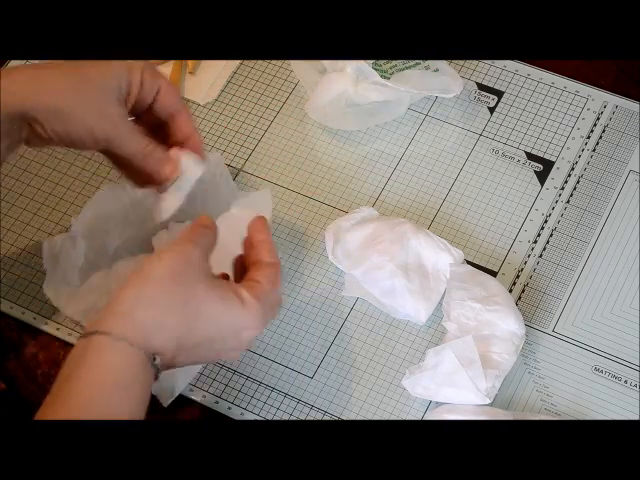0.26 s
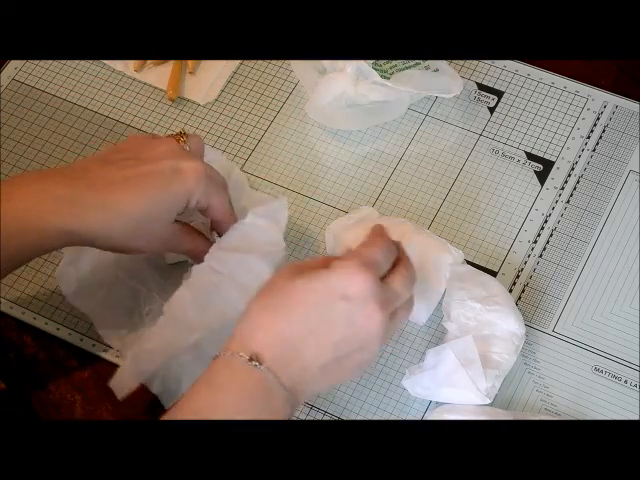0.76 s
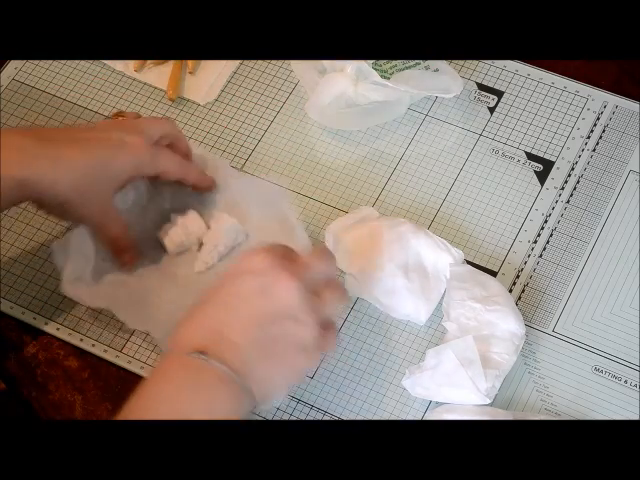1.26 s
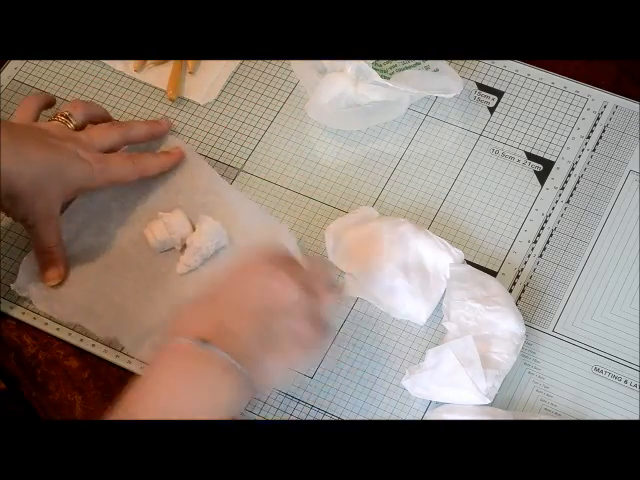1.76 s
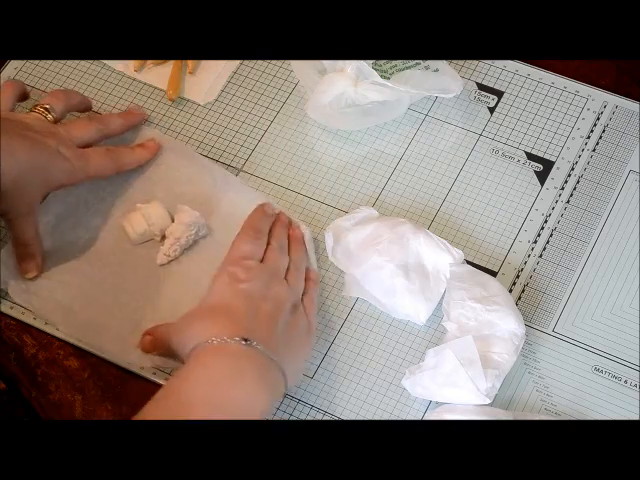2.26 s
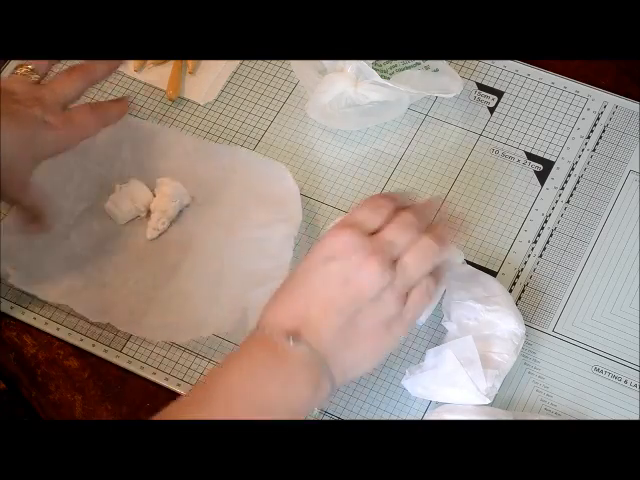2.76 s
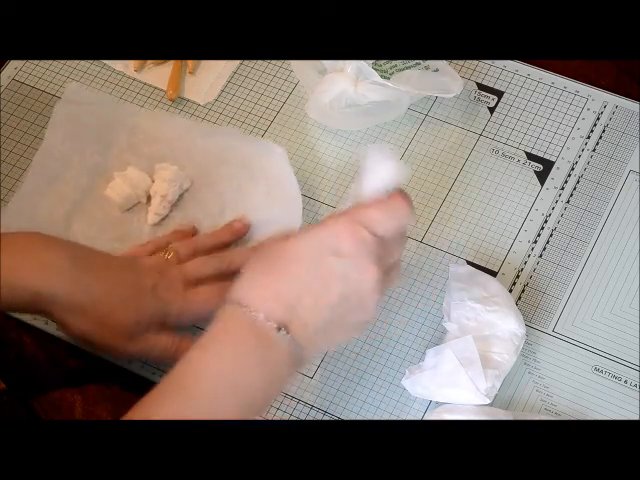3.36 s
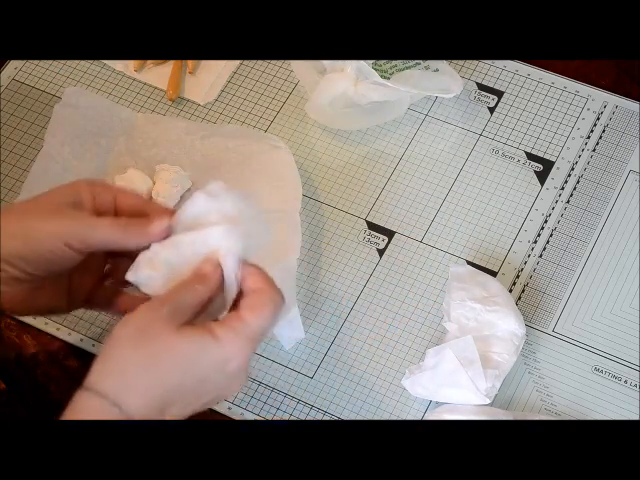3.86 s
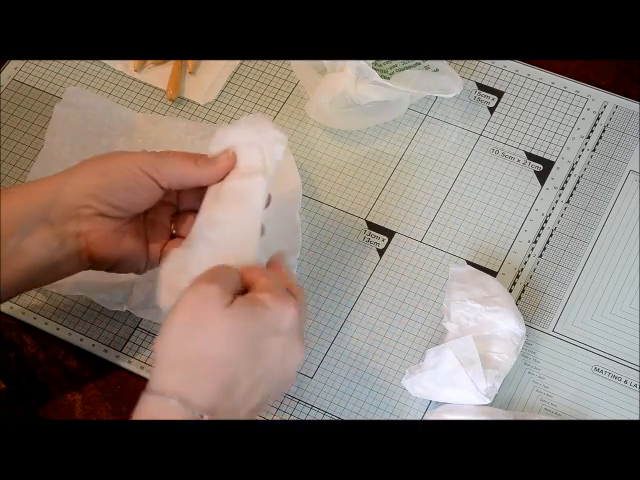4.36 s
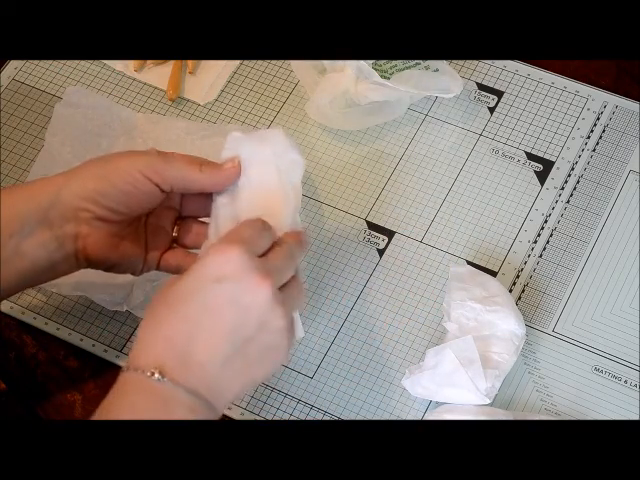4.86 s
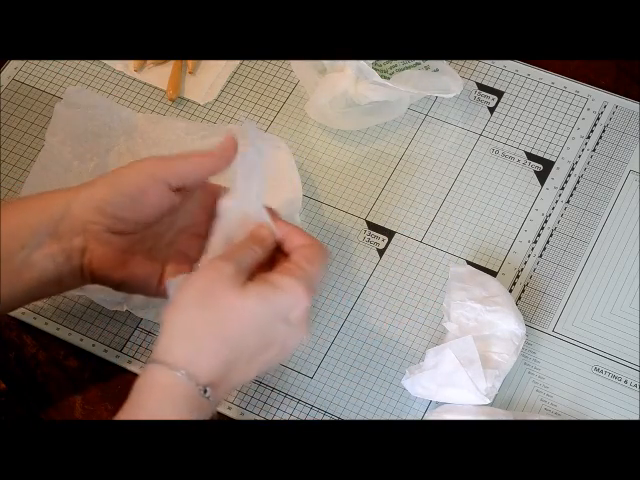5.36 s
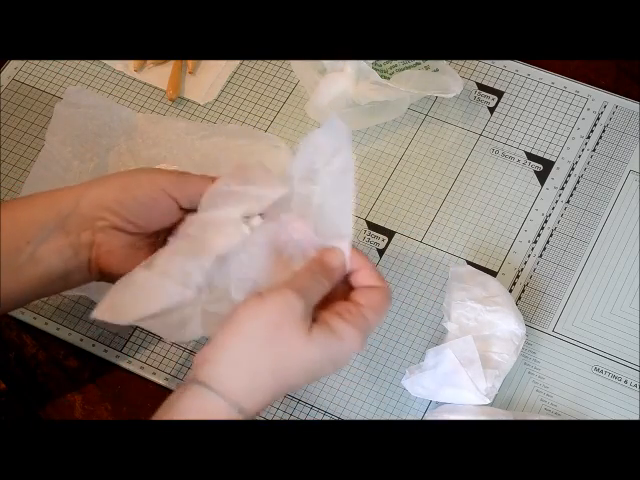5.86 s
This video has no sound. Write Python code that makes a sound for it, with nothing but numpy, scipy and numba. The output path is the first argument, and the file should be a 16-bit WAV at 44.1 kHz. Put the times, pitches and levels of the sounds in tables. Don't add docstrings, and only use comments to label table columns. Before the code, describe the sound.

Dry, bright crackling of delicate tissue paper being handled, swelling and easing in uneven strokes, with tiny sharp snaps and soft dull pops.

```python
import sys
import numpy as np
from scipy import signal
from scipy.fft import rfft, irfft, next_fast_len
from scipy.io import wavfile
from scipy.ndimage import uniform_filter1d
from numba import njit

SR = 44100
rng = np.random.default_rng(int(sys.argv[2]) if len(sys.argv) > 2 else 0)


def pcm_store(signal):
    levels = np.round(np.clip(np.atleast_2d(signal), -1, 1) * 32767)
    wavfile.write(sys.argv[1], SR, levels.astype(np.int16).T)


def voltage_ratio(level):
    return 10 ** (np.asarray(level, float) / 20)


N = 268991

# (frequency [Hz], density [dB per Hz])
FLOOR_SPECTRUM = [(15, -46), (25, -11), (381, 3.5), (518, 1.5), (1300, -1), (6280, -18.5), (7130, -20),
                  (7900, -9), (9200, -30), (11000, -20), (14300, -49), (22000, -120)]
# (frequency [Hz], gain [dB])
ROLL_OFF = [(10000, -2), (10600, -5.5), (11200, -12), (11700, -27.5), (12000, -55)]
# (frequency [Hz], density [dB per Hz])
PAPER_SPECTRUM = [(100, -39), (300, -19), (500, -11), (900, -3), (1200, -3), (2000, -4.5), (4500, -2.5),
                  (7000, 0.5), (9400, 8.5), (11000, 2), (14000, -4.5)]
FOLD_EDGES_HZ = [1500., 3500., 6500.]

# (time [s], top rms level [dB], patch frequency [Hz], low body re top [dB], length [ms])
SNAPS = [(0.2136, -52, 6760, -11.5, 1.2), (0.4576, -57, 2330, 11, 1.5), (0.4931, -36.5, 4900, -13, 0.45),
         (0.54, -44, 4130, 3.5, 2.1), (0.7547, -43, 9100, -2.5, 2.6), (0.9756, -35.5, 5870, -4.5, 3.6),
         (1.446, -32, 8870, -16, 1.7), (1.4814, -29.5, 8830, -16, 1.2), (1.509, -29, 9260, -13, 1.4),
         (1.908, -50, 6080, -6, 1.1), (2.0372, -45, 5930, -21, 1.1), (2.068, -43, 7400, -17, 1.4),
         (2.58, -34.5, 8630, -15, 1.24), (2.6409, -31.5, 9200, -14.5, 1.5), (3.419, -37.5, 9500, -19, 1.1),
         (3.6964, -43, 2420, -19, 1.1), (4.585, -37.5, 7110, -8, 0.54), (4.782, -41, 6590, -1.5, 4.2),
         (4.887, -37.5, 9220, -2, 2.1), (5.1641, -39, 9350, -5, 1.9), (5.2422, -32, 6960, -10, 1.5),
         (5.486, -32.5, 9200, -12, 3.3), (5.643, -34.5, 5080, -10, 1.1), (5.924, -35, 9990, -19, 1.5)]
# (time [s], top rms level [dB], patch frequency [Hz], low body re top [dB])
SHEET_TICKS = [(0.058, -48, 8600, -7), (0.0713, -41.5, 8600, -19.5), (0.0775, -48, 8700, -6),
               (0.0895, -48, 5540, -5), (0.0981, -41.5, 8240, -24), (0.1803, -54, 7110, -3),
               (0.274, -40, 7940, -6.5), (0.319, -40, 8700, -3), (0.3662, -43.5, 9430, -4),
               (0.44, -52, 6290, -12.5), (0.5355, -37, 9520, -14), (0.5662, -31, 5300, -11.5),
               (0.7296, -47, 6030, -11), (0.906, -42, 5600, -13), (1.0485, -39, 7540, -8),
               (1.258, -35, 6930, -5), (1.333, -30, 9430, -7), (1.3601, -32, 4260, -20),
               (1.5183, -27.5, 6500, -15), (1.6179, -32, 9820, -33), (1.789, -44, 9650, -19),
               (2, -46, 9500, -15.5), (2.198, -29, 9430, -21), (2.204, -28.5, 9560, -20),
               (2.502, -35, 8180, -20), (2.6847, -41.5, 3800, -12), (2.722, -42.5, 8500, -18),
               (2.745, -44, 9900, -21), (2.814, -52, 8960, -10), (2.8304, -43, 9100, -14)]
# (time [s], top rms level [dB], patch frequency [Hz], low body re top [dB])
BUNDLE_TICKS = [(3.0168, -35, 3010, -21), (3.027, -39, 8310, -18), (3.314, -39.5, 8400, -22),
                (3.332, -41.5, 4610, -10.5), (3.491, -44, 8790, -11), (3.5939, -36.5, 4000, -18),
                (3.62, -44, 9350, -37), (3.6732, -44, 5100, -17), (3.7183, -36, 2660, -17),
                (3.7374, -42, 5170, -21), (3.7588, -43, 3005, -17), (3.7775, -39, 8350, -24),
                (3.8017, -42.5, 6420, -3), (3.8601, -33, 9400, -28), (3.9008, -37, 6940, -7),
                (4.0146, -37, 4570, -17), (4.1259, -35, 6000, -9.5), (4.151, -33.5, 5130, -18),
                (4.4697, -38, 8790, -15), (4.623, -40.5, 9300, -16), (4.6876, -38.5, 6260, -24),
                (4.75, -31, 9200, -12), (4.7959, -32.5, 9560, -7), (5.106, -44, 4090, -16),
                (5.1385, -29, 7400, -14), (5.3042, -39, 7100, -3), (5.7, -34, 2800, -27),
                (5.7605, -33.5, 8450, -21), (5.8788, -28, 9300, -11), (6.0288, -33.5, 8700, -20)]
# (time [s], top rms level [dB], patch frequency [Hz])
FAINT_TICKS = [(.0116, -50, 9100), (0.037, -62, 8480), (0.4785, -49, 4910), (.485, -45.5, 5700),
               (.51, -46, 4090), (0.5173, -46, 8570), (0.5307, -46, 9560), (0.7192, -45, 3830),
               (0.8847, -50, 3400), (1.1123, -49, 9470), (1.8237, -47, 6800), (2.0192, -48, 3790),
               (2.314, -35, 9470), (2.486, -38, 4480), (2.6333, -38, 8700), (2.7319, -43, 9900),
               (3.3244, -40, 3140), (3.408, -37.5, 8660), (3.6005, -58, 8700), (3.649, -47, 4800),
               (4.0303, -41.5, 7110), (4.083, -41.5, 4820), (4.245, -36.5, 8350), (4.4155, -45, 6290),
               (4.4955, -40.5, 3180), (4.539, -41.5, 4350), (4.9426, -36, 5430), (5.0697, -40.5, 8740),
               (5.3498, -41, 9470), (5.4047, -39, 9390)]
# (time [s], peak level [dB], patch frequency [Hz])
RUSTLE_TICKS = [(0.0034, -45, 6240), (0.7864, -45, 4480), (0.832, -44, 4240), (0.8673, -36.5, 5380),
                (0.8874, -45, 3300), (0.898, -37, 5590), (0.943, -42, 3780), (1.0044, -37, 6410),
                (1.0564, -34, 9240), (1.0874, -45, 5120), (1.1254, -46, 3630), (1.1518, -39, 8880),
                (1.1703, -33, 8670), (1.192, -29, 9020), (1.4165, -28, 9400), (1.5696, -24, 8950),
                (1.737, -30.5, 9200), (1.7634, -36, 5840), (2.073, -30, 8770), (2.0857, -32, 9600),
                (2.127, -25, 9350), (2.141, -21, 9200), (2.284, -35, 9690), (2.3316, -32, 9080),
                (2.3944, -31.5, 7420), (2.413, -29, 10000), (2.4744, -37, 4300), (2.518, -29, 9780),
                (2.82, -43, 8780), (2.8973, -43, 9530), (2.918, -35, 3590), (2.9731, -38, 5670),
                (3.0495, -38, 6160), (3.0879, -32, 4790), (3.1101, -27.5, 6960), (3.1557, -32, 9340),
                (3.1734, -31, 9690), (3.575, -47, 3920), (3.8377, -30, 4480), (3.931, -32, 4760),
                (4.271, -32, 9870), (4.2946, -26.5, 8480), (4.7292, -33, 8930), (4.8164, -35, 6370),
                (4.8367, -32, 4320), (4.8524, -33, 4670), (4.9177, -33, 4140), (4.9684, -25, 9260),
                (4.981, -29, 5710), (4.9964, -31, 4450), (5.026, -34, 3210), (5.2238, -32, 3890),
                (5.3897, -35, 9390), (5.676, -29, 9310), (5.8373, -28, 9600), (5.8944, -32, 5190),
                (5.9924, -32, 3710),
                (0.82, -43, 9500), (1.040, -43, 6000), (4.3, -36, 7070), (5.1395, -24, 9300),
              (5.144, -38, 8200), (5.7, -37, 7200), (5.196, -35, 8700), (2.278, -41, 5000),
              (2.176, -30, 9300), (5.622, -34, 9000), (5.687, -32, 9300), (5.708, -29, 9900),
              (.709, -46, 8800),
                (1.2004, -31, 9010), (1.2714, -31, 4690), (1.3194, -26, 8700), (1.3874, -29, 5650),
               (1.3974, -28, 9560), (1.4624, -25, 8720), (1.5474, -26, 8710), (1.5954, -27, 9750),
               (1.6474, -30, 9790), (1.6614, -30, 8720), (1.7044, -36, 3000), (3.3867, -33, 8620),
               (3.5758, -38, 3920), (3.8541, -27, 7360), (3.8834, -32, 4080), (3.8914, -33, 6830),
               (3.9424, -34, 4750), (3.9604, -38, 5230), (4.1894, -37, 5420), (4.3064, -31, 5610),
               (4.3394, -34, 3360), (4.3924, -34, 4240), (4.6394, -41, 8590), (5.5344, -32, 9220)]
# (time [s], peak level [dB], fold frequency [Hz])
POPS = [(0.011, -48, 1780), (0.056, -50, 1860), (0.231, -54, 1480), (0.267, -48, 3290), (0.299, -40, 4220),
        (0.477, -39, 1460), (0.886, -44, 2090), (0.95, -45, 3750), (0.977, -35, 2560), (1.157, -40, 4700),
        (1.254, -31, 4340), (1.27, -31, 3520), (1.506, -33, 4580), (1.621, -40, 2220), (1.671, -41, 3710),
        (2.067, -38, 3040), (2.121, -34, 4360), (2.139, -30, 1180), (2.209, -32, 1570), (2.327, -39, 1500),
        (2.909, -43, 1030), (2.94, -36, 2800), (2.966, -37, 2260), (3.017, -38, 3140), (3.049, -43, 1480),
        (3.084, -34, 3320), (3.525, -35.5, 4030), (4.335, -36, 3360), (4.829, -36, 1450),
        (4.868, -32, 4460), (4.886, -37, 3610), (4.962, -32, 4460), (5.138, -34, 3400), (5.164, -33, 2000),
        (5.21, -36, 3430), (5.366, -43, 894), (5.467, -30, 2970), (5.611, -36, 2340), (5.657, -31, 1960),
        (5.684, -32, 2610), (5.707, -44, 2370), (5.859, -35, 2080), (5.973, -34, 2670), (6.076, -40, 1800)]

# (peak time [s], rustle level [dB], rise [ms], fall [ms], coarseness [dB])
SHEET_STROKES = [(.03, -61.5, 120, 220, 5.5), (.323, -55.5, 106, 103, 2), (.49, -55.5, 30, 200, 3),
                 (.655, -51, 123, 25, -4.5), (.765, -52, 87, 102, -0.5), (.887, -51, 17, 25, -1),
                 (.908, -49.5, 15, 55, -1.5), (0.981, -53, 27, 240, 6.5), (1.1, -54.5, 150, 110, -4.5),
                 (1.155, -51, 11, 30, -4), (1.173, -44, 8, 85, -3.5), (1.27, -41.5, 54, 430, -3.5),
                 (1.41, -43, 220, 130, -8), (1.517, -38.5, 120, 74, -1.5), (1.61, -42.5, 100, 82, -8),
                 (1.7, -48.6, 83, 100, -1.5), (1.778, -49.6, 120, 50, -6.5), (1.87, -67, 70, 200, 1),
                 (2.042, -54, 7, 45, -3.5), (2.07, -44.5, 6, 25, -3), (2.09, -43, 10, 60, -4),
                 (2.127, -38, 14, 30, -8), (2.146, -33.5, 28, 32, -5.5), (2.175, -37, 23, 54, -4.5),
                 (2.22, -50, 60, 80, 2), (2.28, -45.5, 45, 59, -2), (2.335, -43, 13, 150, -1),
                 (2.493, -43.5, 34, 100, -2), (2.575, -49, 110, 42, -5), (2.642, -52.5, 26, 71, -1),
                 (2.74, -63.5, 100, 130, 0)]
# (peak time [s], rustle level [dB], rise [ms], fall [ms], coarseness [dB])
BUNDLE_STROKES = [(2.912, -50.5, 17, 350, 3), (3.1, -42, 31, 74, -2.5), (3.17, -49, 35, 93, 1.5),
                  (3.412, -50.5, 170, 160, -7), (3.53, -54.5, 120, 260, -3.5), (3.777, -51.5, 24, 50, -0.5),
                  (3.857, -43, 26, 60, -4.5), (3.945, -50.5, 37, 240, -5), (4.127, -47.5, 67, 165, -5.5),
                  (4.302, -43, 86, 140, -5), (4.42, -50.5, 40, 50, -3), (4.5, -53.5, 50, 55, -2.5),
                  (4.625, -55, 36, 66, -3.5), (4.69, -54, 30, 50, -4), (4.753, -44, 16, 140, -0.5),
                  (4.856, -42.5, 13, 40, -2), (4.882, -38.5, 30, 39, 0), (4.918, -46, 20, 28, 2),
                  (4.945, -39, 10, 44, -1), (4.975, -41.5, 34, 77, -1), (5.149, -45.5, 37, 110, 0),
                  (5.248, -46.5, 42, 58, -0.5), (5.36, -51.5, 180, 460, 0.5), (5.491, -38, 21, 90, -1.5),
                  (5.56, -46.5, 50, 66, -1), (5.62, -43, 34, 35, -1), (5.645, -43.5, 11, 29, -3),
                  (5.68, -40, 25, 27, -2), (5.705, -42.5, 14, 50, -1.5), (5.79, -42.5, 83, 70, 0.5),
                  (5.875, -43.5, 44, 74, -1), (5.975, -44, 33, 50, -1), (6.04, -49, 60, 67, -0.5),
                  (6.078, -47.5, 13, 52, 0.5)]
# (time [s], level [dB])
TAUTNESS = [(0, 1), (.1, 6.5), (.45, -8), (.62, -1.5), (.78, -10), (.95, 1), (1.29, -2.5), (1.47, 3),
            (1.899, -2.5), (2.15, -0.5), (2.36, 3), (2.56, -0.5), (2.68, 4), (3.4, -6), (3.73, -5),
            (4.2, -5), (5.4, -1), (6.1, -2)]
# (time [s], level [dB])
LIFT = [(0, -1), (.8, 2), (1.3, -0.5), (2.1, -1), (2.55, -4.5), (2.85, 2.5), (3.2, -5), (3.55, 5),
        (3.8, -4), (4.3, 3), (5.2, -1.5), (6.1, 3.5)]
# (start [s], end [s], resonance [Hz], boost [dB])
POCKETS = [(0.567, 0.659, 5000, 7), (0.975, 1.04, 2430, 4), (2.118, 2.212, 1160, 4.5),
           (2.12, 2.215, 1580, 3), (4.858, 4.91, 4600, 4.5), (4.94, 5.026, 4560, 3),
           (5.693, 5.742, 2400, 6), (5.85, 5.885, 2080, 3), (2.47, 2.54, 4500, 5.5), (3.08, 3.143, 1000, 7),
           (5.61, 5.71, 2290, 5), (6.047, 6.1, 2380, 6.5)]

FLOOR_DB = -68
ROOM_T60_S, ROOM_DB = 0.29, -6
NOTCH_HZ, NOTCH_WIDTH_HZ, NOTCH_DB = 7890, 260, -6
STRAY_DB, STRAY_FOLLOWS, STRAY_SCATTER_DB = -46.5, 0.8, 3.5
STRAY_BODY_DB, STRAY_LOW_HZ, STRAY_TOP_HZ = -14.5, 3160, 10500
PEAK_OVER_RMS_DB = 8
POP_MS, POP_WIDTH_SHARE = 2.15, 0.14
STROKE_ROUNDNESS, STROKE_END = 1.17, 0.042
REST_DB, REST_COARSENESS_DB = -79, 14
BIG_FOLD_DB, BIG_SHARE, BROAD_SHARE = -6, 1.06, 0.97


def unit(x):
    return x / np.sqrt(np.mean(x ** 2))


def shape(x, gain_of_hz):
    size = next_fast_len(len(x) + 4096)
    hz = np.arange(size // 2 + 1) * SR / size + 1
    return irfft(rfft(x, size) * gain_of_hz(hz), size)[:len(x)]


def colour(x, table):
    hz, db = np.transpose(table)
    return shape(x, lambda f: voltage_ratio(np.interp(np.log(f), np.log(hz), db)))


def curve(table):
    return np.interp(np.arange(N) / SR, *np.transpose(table))


def room_floor():
    return voltage_ratio(FLOOR_DB) * unit(colour(rng.standard_normal(N), FLOOR_SPECTRUM))


def room(x):
    t = np.arange(SR // 2) / SR
    tail = rng.standard_normal(len(t)) * voltage_ratio(-60 * t / ROOM_T60_S)
    tail *= t > .003
    wet = signal.fftconvolve(x, tail / np.linalg.norm(tail))[:N]
    return voltage_ratio(ROOM_DB) * shape(wet, lambda f: 1 / (1 + (f / 3700.0) ** 2))


@njit
def buckle(start, size, hz, width, length, ring, noise):
    out = np.zeros(len(noise))
    for k in range(len(start)):
        radius = np.exp(-np.pi * width[k] / SR)
        pole = radius * np.exp(2j * np.pi * hz[k] / SR)
        boost = ring * np.sqrt(2 * (1 - radius * radius))
        fade, rise = np.exp(-1 / length[k]), np.exp(-8 / length[k])
        falling, rising = size[k], size[k]
        z = 0j
        for i in range(start[k], min(start[k] + int(6 * length[k]) + 60, len(out))):
            falling, rising = falling * fade, rising * rise
            push = (falling - rising) * noise[(i + 7919 * k) % len(noise)]
            z = z * pole + push
            out[i] += (1 - ring) * push + boost * z.real
    return out


def pops():
    s, db, hz = np.transpose(POPS)
    start = (s * SR).astype(np.int64)
    length = np.full(len(s), POP_MS * SR / 1000)
    tearing = np.sign(rng.standard_normal(N))
    flip = buckle(start, voltage_ratio(db - 0.2), hz, POP_WIDTH_SHARE * hz, length, 0.78, tearing)
    return shape(flip, lambda f: 1 / (1 + (580.0 / f) ** 4 + (f / 4200.0) ** 4))


def hands():
    t = np.arange(0, N / SR + .002, .002)
    strokes = np.transpose(SHEET_STROKES + BUNDLE_STROKES)[:, :, None]
    s, db, rise_ms, fall_ms, coarse_db = strokes
    away = 1000 * np.abs(t - s) / np.where(t < s, rise_ms, fall_ms)
    power = voltage_ratio(2 * (db - 10 * (away ** STROKE_ROUNDNESS + STROKE_END * away ** 4)))
    rest = voltage_ratio(2 * REST_DB)
    total = power.sum(axis=0) + rest
    coarse = ((power * coarse_db).sum(axis=0) + rest * REST_COARSENESS_DB) / total
    return [np.interp(np.arange(N) / SR, t, x) for x in (10 * np.log10(total), coarse)]


def strays(count):
    chance = rng.random((count, 4)).T
    s = chance[0] * (N - 1) / SR
    effort_db = hands()[0][(s * SR).astype(int)]
    scatter_db = STRAY_SCATTER_DB * np.minimum(-np.log(chance[1] + 1e-9), 2)
    db = STRAY_DB + STRAY_FOLLOWS * (effort_db + 50) + scatter_db
    hz = STRAY_LOW_HZ * (STRAY_TOP_HZ / STRAY_LOW_HZ) ** np.sqrt(chance[2])
    return list(zip(s, db, hz, STRAY_BODY_DB + 14 * (chance[3] - .5)))


def snaps():
    peaks = RUSTLE_TICKS
    ticks = SHEET_TICKS + BUNDLE_TICKS + [(*faint, STRAY_BODY_DB) for faint in FAINT_TICKS]
    ticks = ticks + [(s, db - PEAK_OVER_RMS_DB, hz, STRAY_BODY_DB) for s, db, hz in peaks]
    ticks = ticks + strays(count=60)
    s, db, hz, body_db, ms = np.transpose(SNAPS + [(*tick, .9) for tick in ticks])
    length = ms * SR / 1000
    start = (s * SR).astype(np.int64)
    tearing = np.sign(rng.standard_normal((2, N)))
    crack = buckle(start, voltage_ratio(db + 7), hz, .2 * hz, 1.1 * length, .7, tearing[0])
    settle = buckle(start, voltage_ratio(db - 5.5), hz, hz / 2, 5.5 * length, 0.52, rng.standard_normal(N))
    flap_hz, flap_width_hz = np.full(len(s), 1300.), np.full(len(s), 1200.)
    flap = buckle(start, voltage_ratio(db + body_db + 4.0), flap_hz, flap_width_hz, 1.82 * length, 0.6, tearing[1])
    bright = shape(crack + settle, lambda f: 1 / (1 + (2500.0 / f) ** 4 + (f / 11540.0) ** 14))
    return bright + shape(flap, lambda f: 1 / (1 + (296.0 / f) ** 4))


def walk(rate):
    k = int(SR / rate)
    held = np.repeat(rng.standard_normal(N // k + 1), k)
    return unit(uniform_filter1d(held, k)[:N])


def finger_slide():
    return voltage_ratio(-6.5) * unit(rng.standard_normal(N) * voltage_ratio(2.5 * walk(45)))


def flurries(rate, fade_ms):
    jolts = rng.exponential(size=N) * (rng.random(N) < rate / SR)
    x = signal.lfilter([1], [1, -np.exp(-1000 / (fade_ms * SR))], jolts)
    return np.minimum(unit(x - x.mean()), 2.5)


def creases(count, scatter_db, biggest_db, cluster_db, low_hz, top_hz, length_ms, ring):
    chance = rng.random((count, 4)).T
    start = (chance[0] * N).astype(np.int64)
    cluster = cluster_db * flurries(70, fade_ms=2.8)[start]
    size = voltage_ratio(np.minimum(-scatter_db * np.log(chance[1] + 1e-9), biggest_db) + cluster)
    hz = low_hz * (top_hz / low_hz) ** (chance[2] ** 0.384)
    length = length_ms * SR / 1000 * (0.44 + 1.7 * chance[3])
    return unit(buckle(start, size, hz, 300 + 0.06 * hz, length, ring, rng.standard_normal(N)))


def pockets(x):
    t = np.arange(N) / SR
    out = x.copy()
    for t0, t1, hz, boost_db in POCKETS:
        held = np.interp(t, [t0 - .01, t0, t1, t1 + .01], [0, 1, 1, 0])
        out += signal.lfilter(*signal.iirpeak(hz, 7.0, fs=SR), x * held * (voltage_ratio(boost_db) - 1))
    return out


def rustle():
    effort_db, coarse_db = hands()
    big_db = BIG_FOLD_DB + BIG_SHARE * coarse_db + curve(LIFT)
    broad_db = BROAD_SHARE * coarse_db
    fine_db = curve(TAUTNESS)
    middle_db = effort_db - 10 * np.log10(1 + voltage_ratio(2 * broad_db) + voltage_ratio(2 * fine_db))
    shower = creases(count=16000, scatter_db=2.5, biggest_db=9.5, cluster_db=1.1,
                     low_hz=1000., top_hz=11170.0, length_ms=0.63, ring=0.35)
    sheet = colour(shower + finger_slide(), PAPER_SPECTRUM)
    big, broad, middle = (shape(sheet, lambda f: 1 / (1 + (f / edge) ** 6)) for edge in FOLD_EDGES_HZ)
    folds = [(big, big_db - 0.5), (broad - big, broad_db - .8),
             (middle - broad, -.3), (sheet - middle, fine_db + 0.2)]
    return sum(unit(x) * voltage_ratio(middle_db + more_db) for x, more_db in folds)


def scene():
    paper = pockets(rustle()) + snaps() + pops()
    return (paper + room(paper) + room_floor())[None]


def roll_off(x):
    return signal.sosfilt(signal.butter(12, 11840, fs=SR, output="sos"), x)


def record(dry):
    port = shape(dry[0], lambda f: voltage_ratio(NOTCH_DB * np.exp(-((f - NOTCH_HZ) / NOTCH_WIDTH_HZ) ** 2)))
    return roll_off(colour(port, ROLL_OFF)[None])


dry = scene()
out = record(dry)
pcm_store(out)
```